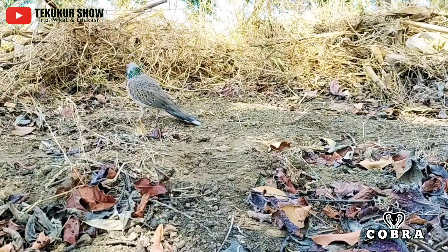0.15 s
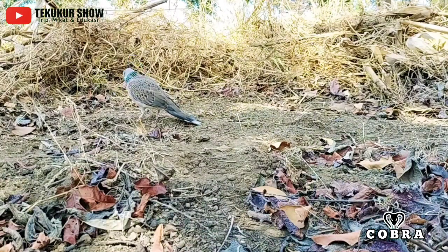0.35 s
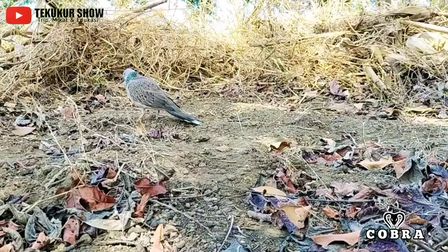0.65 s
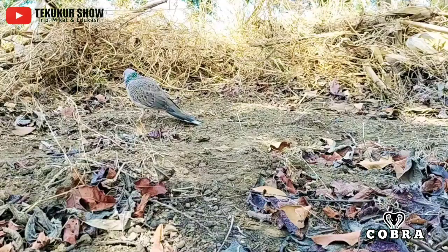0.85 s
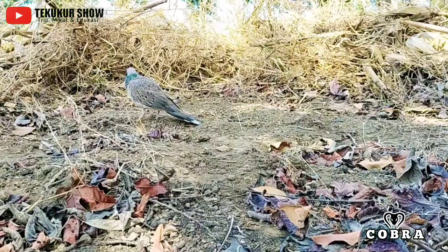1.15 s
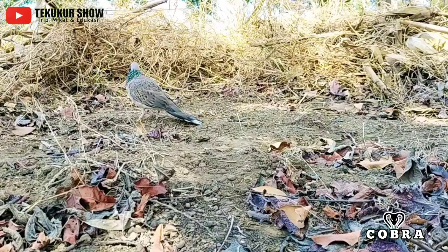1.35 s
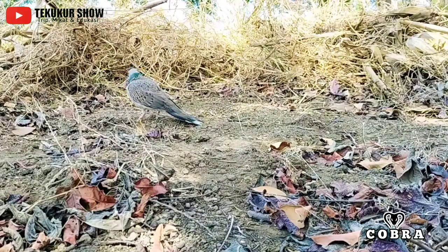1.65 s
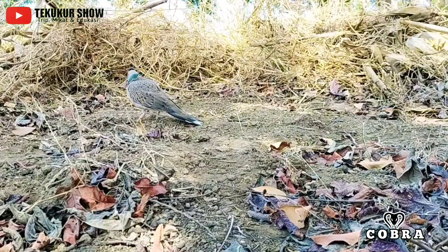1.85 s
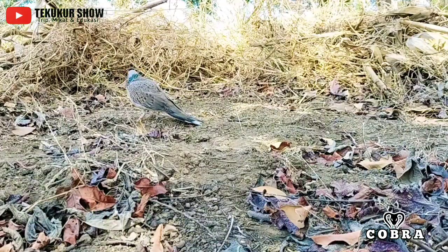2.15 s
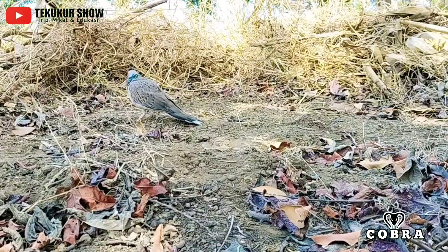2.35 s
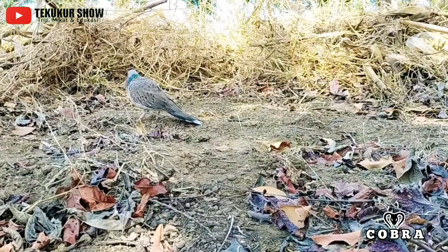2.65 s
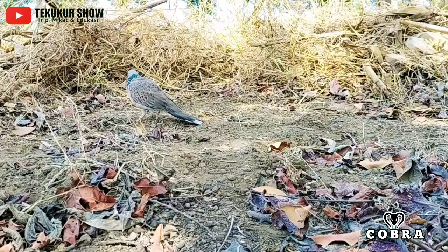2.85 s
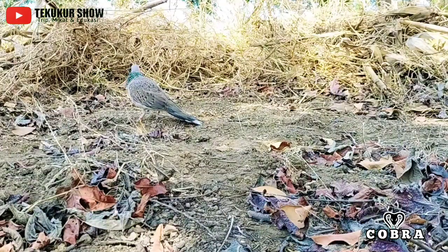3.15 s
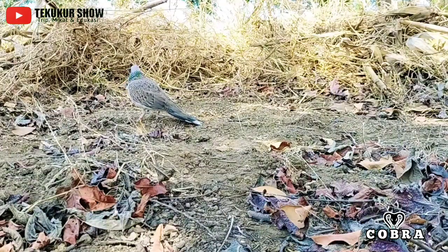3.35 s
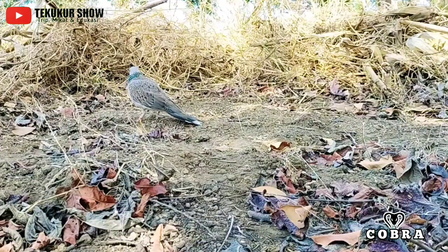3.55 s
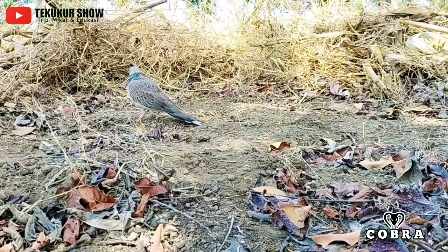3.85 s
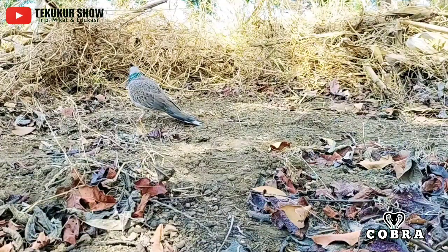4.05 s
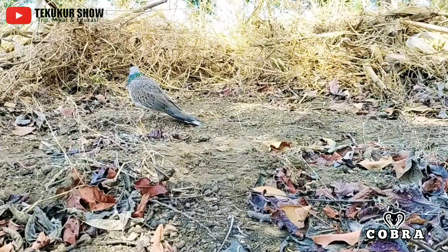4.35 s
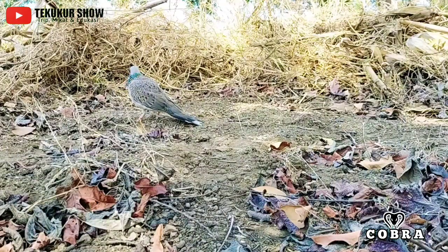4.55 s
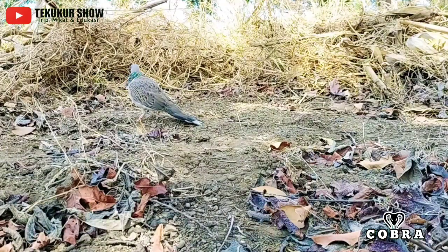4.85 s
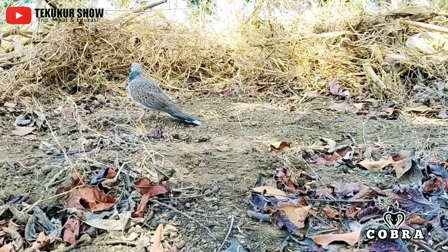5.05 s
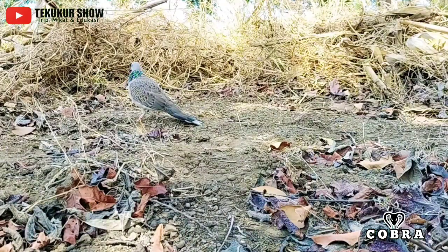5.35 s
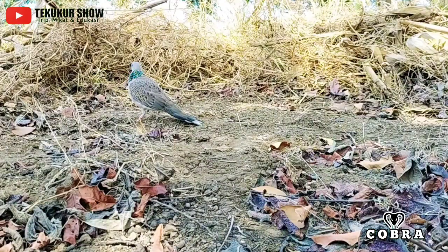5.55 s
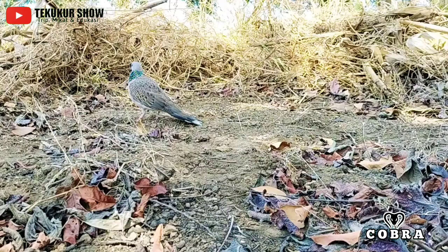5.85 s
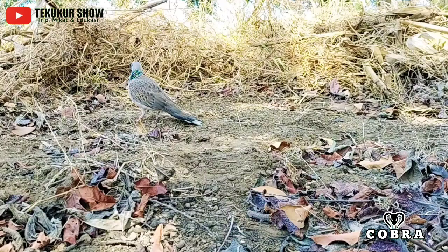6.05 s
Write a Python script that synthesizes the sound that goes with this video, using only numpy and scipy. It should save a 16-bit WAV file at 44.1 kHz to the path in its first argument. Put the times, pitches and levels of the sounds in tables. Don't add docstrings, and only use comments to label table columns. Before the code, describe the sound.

Outdoors on dry ground, a close dove sings three phrases of rolling, throaty coos: short opener, rising purr to a clear falling hoot, then a long fluttering note. The middle phrase is hoarser and lacks the hoot. A farther dove answers softly between and after. Dry leaves crackle and tick, busiest early, over steady traffic rumble, faint engine drone and thin hiss.

```python
import sys
import numpy as np
from scipy import signal
from scipy.fft import rfft, irfft
from scipy.io import wavfile
from scipy.ndimage import uniform_filter1d

SR = 44100
rng = np.random.default_rng(int(sys.argv[2]) if len(sys.argv) > 2 else 0)


def generate_wav(signal):
    frames = np.transpose(np.atleast_2d(signal))
    scaled = np.clip(frames, -1, 1) * 32767
    pcm = np.round(scaled).astype(np.int16)
    wavfile.write(sys.argv[1], SR, pcm)


def ratio_of_db(decibels):
    return 10 ** (np.asarray(decibels, float) / 20)


N = 273853

# (frequency [Hz], density [dB per Hz])
AIR_SPECTRUM = [(12, -36.5), (20, -4.5), (43, 1), (113, -1.5), (198, -11), (221, -8.5), (327, -15),
                (365, -18), (444, -18), (571, -26.5), (844, -27), (1080, -36), (3050, -36.5), (7660, -48.5),
                (15800, -50)]
# (time [s], level [dB])
RUMBLE_SWELL = [(0.0, -45), (.3, -44.5), (2.7, -43.5), (4.8, -45), (5.64, -46.5), (6.21, -45.5)]
# (frequency [Hz], correlation [-1 to 1])
LIKENESS = [(60, 0.96), (150, 0.95), (380, 0.79), (950, 0.14), (2380, -0.099), (5980, 0.082),
            (15000, -0.31)]
# (frequency [Hz], left over right [dB])
LEAN = [(60, 0.5), (130, -1), (290, -0.5), (640, -1), (1410, -3.5), (3100, -4), (6820, 2.5), (15000, 0)]
# (frequency [Hz], width [Hz], level [dB])
ENGINE_LINES = [
    (75.8, 2.4, -58.5),
    (161, 5.9, -65),
    (243.6, 5.2, -64),
    (328.7, 4.2, -64.5),
]
# (frequency [Hz], density [dB per Hz])
LEAF_SPECTRUM = [(600, -26), (1200, -1.5), (2300, -12), (2900, -9), (3600, 0), (4300, -10.5), (5500, -16.5),
                 (8000, -21.5), (15000, -22)]
# (time [s], peak level [dB], time to fade by 10 dB [s], 0.003 at least)
STIRRINGS = [(0.0, -54, 0.05), (.21, -61, -0.14), (.243, -51, 0.06), (.29, -60, 0.06), (0.349, -55.5, 0.18),
             (0.389, -53, 0.04), (.42, -62.5, 0.34), (0.899, -64.5, 0.75), (1.21, -60.5, 0.1),
             (1.31, -66, -0.5), (1.914, -49, 0.12), (1.94, -56.5, 0.15), (2.021, -50.5, 0.07),
             (2.075, -55.5, 0.12), (2.297, -55, 0.08), (2.47, -61, 0.33), (2.65, -56, 0.05),
             (2.78, -60, 0.3), (2.84, -70, 1.45), (4.1, -62, 0.9), (4.31, -53.5, -0.82), (6.21, -53, -1.96)]
# (time [s], peak level [dB], ring [Hz], left over right [dB])
LEAF_TICKS = [(0.0004, -48, 2070, -5), (0.0293, -50, 2140, -15), (0.191, -55, 3400, -1),
              (0.2025, -48, 3500, 0), (0.238, -50, 3200, -8.5), (0.253, -48, 2590, -10),
              (0.2862, -51, 3760, -12), (0.3376, -51, 3780, -9), (0.3505, -26.5, 4240, -8),
              (0.392, -51, 3350, -2), (0.5599, -39.5, 2090, -4), (1.1934, -57, 2350, -6),
              (1.2084, -54, 2300, -6), (1.275, -60, 2290, -10), (1.306, -60, 2620, -5),
              (1.3184, -63, 2610, -3), (1.8965, -54, 4000, 7), (1.909, -49, 3970, -20),
              (1.943, -57, 2000, 5), (1.9774, -53, 3520, 0), (2.004, -71, 3600, 3), (2.0167, -44, 5000, 5),
              (2.0203, -50, 5200, 14), (2.026, -48, 4470, 1), (2.065, -58.5, 3750, -15),
              (2.251, -53, 3540, 0), (2.2962, -45, 4230, 3), (2.773, -55, 3720, 1), (2.854, -47, 3700, -8),
              (4.0492, -64.5, 2260, 1), (4.405, -41, 3300, -3), (4.2777, -48.5, 3900, -9),
              (4.313, -48, 3900, -7), (4.3994, -54, 3630, -1.5), (5.1974, -72, 2390, -1),
              (5.8745, -47, 6360, 0)]

# (time from mark [s], peak level [dB], pitch [Hz], puffs from mark [count],
# valve closure [0-1])
KU = [(0, -35, 596, 0, 1), (.004, -34, 570, .45, .8), (.009, -21.5, 570, .85, .1), (.026, -15, 645, 2, .2),
      (.038, -12.7, 685, 3, .65), (.05, -13, 650, 4, .9), (.068, -27, 600, 5, 1), (.083, -27, 560, 6, 1),
      (.1, -38, 610, 7, 1), (.135, -41, 605, 9, 1)]
HOOK = [(-.15, -46, 570, -11, 1), (-.092, -26, 590, -7, 1), (-.079, -20, 610, -6, 1),
        (-.052, -15, 650, -4, 1), (-.013, -13, 710, -1, 1), (0, -13, 745, 0, .85),
        (.009, -14.5, 785, 1, .4), (.016, -19, 805, 1.6, .05), (.033, -18.8, 803, 2.8, 0),
        (.062, -18.5, 750, 5.4, 0), (.08, -17, 638, 7, 0), (.086, -36, 625, 8, 0)]
LONG = [(0, -17.3, 640, 0, 1), (.017, -13, 716, 1, 1), (.059, -13, 722, 3, 1), (.08, -13.1, 722, 4, 1),
        (.189, -13, 712, 10, .95), (.255, -12.3, 688, 14, .88), (.286, -11.5, 700, 16, .85),
        (.312, -12, 712, 18, .75), (.336, -13, 708, 20, .75), (.351, -12.8, 692, 21, .8),
        (.361, -12, 672, 22, .65), (.395, -12, 652, 25, .75), (.418, -13.6, 645, 27, .85),
        (.439, -12.3, 642, 28, .55), (.464, -13, 620, 29, .08), (.478, -17, 588, 30, .05),
        (.5, -20.5, 538, 31.2, 0), (.522, -37, 460, 33, 0)]
LAST_LONG = [(0, -19.6, 625, 0, 1), (.015, -13, 700, 1, 1), (.079, -12.5, 705, 4, 1),
             (.1, -12.5, 700, 5, 1), (.139, -12.3, 697, 7, .97), (.194, -11, 688, 10, .92),
             (.247, -10.8, 665, 13, .85), (.296, -11, 676, 16, .8), (.368, -12.5, 678, 21, .8),
             (.382, -12, 672, 22, .8), (.391, -12, 672, 23, .8), (.409, -11.2, 658, 24, .8),
             (.428, -12.5, 645, 25, .8), (.442, -15, 625, 26, .5), (.487, -20.5, 570, 30, .1),
             (.503, -23.5, 512, 31, 0), (.523, -33, 455, 33, 0)]
HOARSE_KU = [(0, -21, 610, 0, 1), (.01, -15, 640, 1, .9), (.02, -13.5, 665, 2, .9),
             (.043, -13, 675, 4, .85), (.086, -15, 675, 8, .8), (.148, -13.6, 668, 14, .85),
             (.162, -30.8, 544, 15, 1)]
HOARSE_LONG = [(0, -15.3, 620, 0, 1), (.03, -14, 665, 3, .85), (.045, -14, 675, 4, 1),
               (.058, -15, 670, 5, .85), (.12, -14, 690, 12, .85), (.138, -14, 685, 14, .88),
               (.17, -12.8, 665, 18, .9), (.22, -12, 678, 24, .88), (.252, -13.5, 690, 28, .8),
               (.271, -12, 670, 30, .8), (.286, -11.5, 665, 31, .85), (.314, -13, 660, 34, .8),
               (.341, -11.7, 660, 37, .75), (.356, -12.5, 672, 38, .7), (.394, -14, 630, 42, .75),
               (.409, -12.5, 636, 44, .5), (.446, -16.5, 600, 48, .4), (.481, -20.7, 580, 52, .35),
               (.493, -29.2, 558, 53, 1)]
FAR_LEAD = [(0, -46, 575, 0, 0), (.02, -38.5, 635, 1.3, 0), (.044, -39.5, 630, 3, .1),
            (.062, -39.5, 603, 4, 1), (.088, -45, 585, 6, 1), (.105, -45.5, 567, 7, 1),
            (.145, -46, 548, 10, 1), (.217, -38, 640, 16, 1), (.232, -38.5, 650, 17, .1),
            (.262, -37, 648, 19.5, 0), (.282, -49, 590, 21, 0)]
FAR_LONG = [(0, -42, 610, 0, 1), (.021, -35, 645, 1, 1), (.109, -34.4, 645, 5, 1),
            (.197, -35.5, 632, 10, .95), (.23, -35, 645, 12, 1), (.246, -37.5, 635, 13, .9),
            (.313, -37.5, 632, 20, .85), (.407, -39.5, 600, 30, .85), (.455, -40.5, 578, 34.5, .7),
            (.512, -45.5, 555, 40, .5)]
PURR = [(0, -47.5, 674, 0, 1), (.044, -46.3, 693, 2, 1), (.104, -49, 630, 5, 1)]
LAST_KU = [(0, -33, 580, 0, 1), (.004, -32, 570, .45, .8), (.009, -21, 575, .85, .1),
           (.024, -15.5, 640, 2, .25), (.035, -13.5, 680, 3, .7), (.045, -15, 660, 4, .9),
           (.057, -18, 615, 5, 1), (.072, -18.8, 600, 6, 1), (.09, -37, 600, 7, 1),
           (.126, -36.5, 590, 9, 1)]
LAST_HOOK = [(-.123, -34, 590, -9, 1), (-.108, -35, 570, -8, 1), (-.079, -21.5, 598, -6, 1),
             (-.051, -14.7, 662, -4, 1), (-.038, -13, 685, -3, .95), (-.012, -13.3, 700, -1, 1),
             (0, -12.8, 725, 0, .85), (.007, -17.5, 775, .8, .05), (.022, -18.5, 790, 2, 0),
             (.05, -15.8, 735, 4.5, 0), (.058, -18, 660, 5.2, 0), (.065, -16, 598, 6, 0),
             (.071, -18.5, 585, 6.6, 0), (.075, -36, 590, 7.3, 0)]

# (shape, mark [s], length [factor], level shift [dB], pitch shift [Hz], puff count [factor]) Faint
FAINT_SONG = [
    (PURR, .058, 1., 0, 0, 1.),
    (PURR, 3.505, .5, 3, -85, .7),
]
NEAR_SONG = [
    (KU, .179, 1., 0, 4, 1.),
    (HOOK, .468, 1., 0, 5, 1.),
    (LONG, .716, 1., 0, 6, 1.),
    (HOARSE_KU, 1.65, 1., 0, 10, 1.),
    (HOARSE_LONG, 1.925, 1., -.5, 10, 1.),
    (LAST_KU, 3.373, 1., 0, 0, 1.),
    (LAST_HOOK, 3.659, 1., 0, 0, 1.),
    (LAST_LONG, 3.902, 1., 0, 4, 1.),
]
FAR_SONG = [
    (FAR_LONG, 2.322, 1., 0, -12, 1.),
    (FAR_LONG, 3.815, 1., -2, -15, 1.2),
    (FAR_LEAD, 4.945, 1., 0, 0, 1.),
    (FAR_LONG, 5.395, 1., 0, 4, 1.),
]
# (time [s], surge [dB], share by which the valve stays open [0-1])
SLIPS = [(.547, 6.5, 0), (1.046, -1.5, .35), (1.072, 0, .4), (1.1, 0, .2), (1.155, .5, .55), (1.935, -5, 0),
         (2.02, -2, 0), (2.055, -1.5, 0), (2.076, 1, .2), (2.092, 1, .3), (2.143, 1.5, .3), (2.155, -2, 0),
         (2.167, 1.5, .45), (2.192, 0, .3), (2.25, 1, .5), (2.319, -2, 0), (2.328, 0, .3), (4.269, -2, 0),
         (4.289, 0, .5), (4.315, .5, .6)]
CATCHES = [1.128, 1.143, 1.164, 1.963, 1.977, 1.997, 2.051, 2.16, 2.183, 2.204, 2.271, 4.276, 4.337]
# (delay [ms], level [dB])
ECHOES = [
    (5.5, -22),
    (9, -21),
    (14, -28.5),
]
# (frequency [Hz], left over right [dB], left phase lead [rad]) Faint purrs
FAINT_PORTS = [(500, -7, .3), (800, -2, 0.417)]
NEAR_PORTS = [(400, 0, .4), (500, -2, .5), (600, -4.2, .8), (720, -5.6, 1.2), (800, -5, 1.55),
              (950, -2.4, 2.1)]
FAR_PORTS = [(400, -1, 1.4), (513, 2, 3), (595, 4.5, 0.14), (760, -0.5, 1.2), (850, 3, 0.71)]
# (frequency [Hz], gain [dB])
MIC_RESPONSE = [(18, -11), (36, -0.5), (2000, 1), (2500, 3.5), (2950, 0), (3600, -1), (6000, 0), (8800, -3),
                (10000, -2), (10800, 0), (11600, -0.5)]

SLIP_S, CATCH_S, CATCH_DB = .007, .002, -7


def evened(x):
    return x / np.sqrt(np.mean(x ** 2) + 1e-20)


def read(points, hz):
    f, value = np.transpose(points)
    return np.interp(np.log(hz + 1), np.log(f + 1), value)


def add(mix, s, sound):
    part = mix[..., max(round(s * SR), 0):][..., :sound.shape[-1]]
    part += sound[..., :part.shape[-1]]


def sides(lean_db):
    return ratio_of_db([[lean_db / 2], [-lean_db / 2]])


def bandpassed(x, low_hz, high_hz):
    return signal.lfilter(*signal.butter(2, [low_hz, high_hz], "band", fs=SR), x)


def hiss(points, size, patchy_db, swell):
    frames, hz = 4 * N // size + 5, np.fft.rfftfreq(size, 1 / SR)
    a, b, c, d, patches = rng.standard_normal((frames, len(hz), 5)).T
    patches = uniform_filter1d(patches, size=10, axis=0)
    patches = evened(uniform_filter1d(patches, size=10, axis=1))
    same = np.clip(read(LIKENESS, hz), -1, 1)[:, None]
    left, other = a + 1j * b, c + 1j * d
    z = np.array([left, same * left + np.sqrt(1 - same ** 2) * other])
    t = np.arange(frames) * size / 4 / SR
    level_db = read(points, hz)[:, None] + patchy_db * patches + swell(t, hz[:, None])
    lean = ratio_of_db(read(LEAN, hz) / 2)[:, None]
    z *= ratio_of_db(level_db) * [lean, 1 / lean]
    return evened(signal.istft(z, nperseg=size, noverlap=3 * size // 4)[1][:, :N])


def air():
    s, db = np.transpose(RUMBLE_SWELL)

    def swell(t, hz):
        return (np.interp(t, s, db) - db.mean()) * (hz < 350)

    return ratio_of_db(-43) * hiss(AIR_SPECTRUM, size=2048, patchy_db=0.48, swell=swell)


def drone():
    hz, out = np.fft.rfftfreq(N, 1 / SR), np.zeros(N)
    for line_hz, width_hz, db in ENGINE_LINES:
        near_line = np.exp(-((hz - line_hz) / width_hz) ** 2)
        out += ratio_of_db(db) * evened(irfft(rfft(rng.standard_normal(N)) * near_line, N))
    return out


def rustle():
    still_db, rise_share = -70.5, 0.096
    t, power = np.arange(N) / SR, ratio_of_db(still_db) ** 2
    for s, db, fade_s in STIRRINGS:
        away_s = np.maximum(t - s, (s - t) / rise_share)
        power = power + ratio_of_db(db - 10 * away_s / max(fade_s, .003)) ** 2
    clumps = evened(uniform_filter1d(rng.standard_normal(N), size=160))
    crackle = hiss(LEAF_SPECTRUM, size=256, patchy_db=3., swell=lambda t, hz: 0 * t)
    return evened(crackle * ratio_of_db(2.9 * clumps)) * np.sqrt(power)


def ticks():
    out, t = np.zeros((2, N)), np.arange(1500) / SR
    for s, db, hz, lean_db in LEAF_TICKS:
        over_db = db + 50
        fade_ms = 2.7 * np.exp(-0.18 * over_db)
        snap_db = -7.5 + 0.1949 * over_db
        grit = rng.standard_normal((2, 2, len(t)))
        ring = bandpassed(grit[0], hz * 0.76, hz * 1.16)
        snap = grit[1] - np.roll(grit[1], 2, axis=1)
        shape = (1 - np.exp(-t / .0003)) * np.exp(-t * 1000 / max(fade_ms, .5))
        burst = evened(shape * ring) + ratio_of_db(snap_db) * evened(shape * snap)
        shape_rms = np.linalg.norm(shape) / np.sqrt(len(t))
        add(out, s, 1.22 * ratio_of_db(db) * sides(lean_db) * shape_rms * burst)
    return out


def sung(shape, mark, stretch, shift_db, shift_hz, flutter):
    rows = np.array(shape) * [stretch, 1, 1, flutter, 1] + [mark, shift_db, shift_hz, 0, 0]
    rows[:, 3] -= np.floor(rows[0, 3])
    t = np.union1d(rows[:, 0], np.arange(rows[0, 0], rows[-2, 0], CATCH_S / 2))
    rows = np.transpose([np.interp(t, rows[:, 0], column) for column in rows.T])
    for s, surge_db, opened in SLIPS:
        rows += np.outer(np.exp(-.5 * ((t - s) / SLIP_S) ** 2), [0, surge_db, 0, 0, -opened])
    for s in CATCHES:
        rows += np.outer(np.exp(-.5 * ((t - s) / CATCH_S) ** 2), [0, CATCH_DB, 0, 0, .3])
    return rows


def coo(rows):
    rise_s, fall_s, fall_share = 0.0041, 0.0083, 0.47
    uneven_turns, uneven_db, wander_hz, slip_rad = 0.03, -0.07, 13, 0.69
    slow_arch_hz, quick_arch_hz, arch_top, sag = 100, 105, 0.42, 1.3
    ragged_from_hz = 84
    octave_db, breath_db = -54, -43

    s, peak_db, pitch_hz, count, closure = np.transpose(rows)
    lead_s, tail_s = .0078, (s[-1] - s[-2]) / (count[-1] - count[-2]) / 2
    t = np.arange(s[0] - lead_s, s[-1] + tail_s, 1 / SR)
    turns = np.interp(t, [t[0], *s, t[-1]], [count[0] - .5, *count, count[-1] + .5])
    period = 1 / (SR * uniform_filter1d(np.gradient(turns), size=200))
    shut = np.clip(np.interp(t, s, closure), 0, 1)
    late, size, jump, stray = np.clip(rng.standard_normal((80, 4)), -2, 2).T
    slow = np.clip((period - .0105) / .006, 0, 1)
    strain = 1 + .6 * np.clip((1 / period - ragged_from_hz) / 12, 0, 1)
    turns = turns + uneven_turns * strain * np.interp(turns, np.arange(80), late)
    puff = np.clip(np.round(turns).astype(int), 0, 79)

    since = (turns - np.round(turns)) * period
    first = t < s[0]
    since[first] *= rise_s / (period[first] / 2)
    side_s = np.where(since < 0, rise_s, np.minimum(fall_s, fall_share * period))
    place = np.clip(since / np.where(first, rise_s, np.minimum(period / 2, side_s)), -1, 1)
    gate = np.cos(np.pi / 2 * place) ** np.where(since < 0, 1.1, 1.0 + 0.3 * slow)
    gate *= ratio_of_db(uneven_db * strain * size[puff])

    top = arch_top * slow
    arch_hz = quick_arch_hz + (slow_arch_hz - quick_arch_hz) * slow
    arch = arch_hz * (np.minimum(place, top) - sag * np.maximum(place - top, 0))
    hz = uniform_filter1d(np.interp(t, s, pitch_hz), size=300) + shut * uniform_filter1d(arch, size=60)
    hz += shut * strain * wander_hz * np.interp(turns, np.arange(80), stray)
    phase = 2 * np.pi * np.cumsum(hz) / SR

    starts = np.flatnonzero(np.diff(puff))
    restart = -np.angle(np.exp(1j * np.diff(phase[starts], prepend=0)))
    restart = restart * np.clip(3 * slow[starts], 0, 1)
    scatter = slip_rad * (strain * jump[puff])[starts]
    slips = np.zeros(len(t))
    slips[starts] = (restart + scatter) * np.clip(2.1 * shut[starts] - .3, 0, 1)
    phase += uniform_filter1d(np.cumsum(slips), size=150)

    flow = ratio_of_db(np.interp(t, s, peak_db)) * (1 - shut + shut * gate)
    flow *= signal.windows.tukey(len(t), 400 / len(t))
    pad = np.zeros(400)
    gullet = signal.butter(3, [455, 960], "band", fs=SR, output="sos")
    tone = signal.sosfiltfilt(gullet, np.r_[pad, flow * np.sin(phase), pad])
    breath = evened(bandpassed(rng.standard_normal(len(t)), 880, 1390))
    tone[400:-400] += flow * (ratio_of_db(octave_db) * np.sin(2 * phase) + ratio_of_db(breath_db) * breath)
    return t[0] - 400 / SR, tone


def dove(notes, gain_db, ports, tail_db, t60_s):
    dry = np.zeros(N)
    for note in notes:
        add(dry, *coo(sung(*note)))
    t = np.arange(SR // 4) / SR
    scatter = rng.standard_normal((2, len(t))) / np.sqrt(SR * t60_s / 14)
    path = ratio_of_db(tail_db - 60 * t / t60_s) * (t > .012) * scatter
    path[:, 0] += 1
    for k, (ms, db) in enumerate(ECHOES):
        path[:, round(ms * SR / 1000)] += ratio_of_db(db) * (-1) ** k
    wet = signal.fftconvolve(dry[None], path, axes=1)[:, :N]
    hz, (f, lean_db, lead_rad) = np.fft.rfftfreq(N, 1 / SR), np.transpose(ports)
    half = ratio_of_db(np.interp(hz, f, lean_db) / 2) * np.exp(.5j * np.interp(hz, f, lead_rad))
    return ratio_of_db(gain_db) * irfft(rfft(wet) * [half, 1 / half], N)


def scene():
    ground = air() + drone() + rustle() + ticks()
    faint = dove(FAINT_SONG, gain_db=-3.5, ports=FAINT_PORTS, tail_db=-10, t60_s=0.25)
    near = dove(NEAR_SONG, gain_db=-2.5, ports=NEAR_PORTS, tail_db=-29, t60_s=.25)
    far = dove(FAR_SONG, gain_db=-0.65, ports=FAR_PORTS, tail_db=-13.5, t60_s=0.38)
    return ground + faint + near + far


def band_limit(x):
    return signal.sosfilt(signal.butter(12, 15990, fs=SR, output="sos"), x)


def record(dry):
    colour = ratio_of_db(read(MIC_RESPONSE, np.fft.rfftfreq(N, 1 / SR)))
    coloured = irfft(rfft(dry) * colour, N)
    edge = signal.firwin(511, 15650, window=("kaiser", 9), fs=SR)
    return band_limit(signal.oaconvolve(coloured, edge[None], "same"))


dry = scene()
out = record(dry)
generate_wav(out)
```